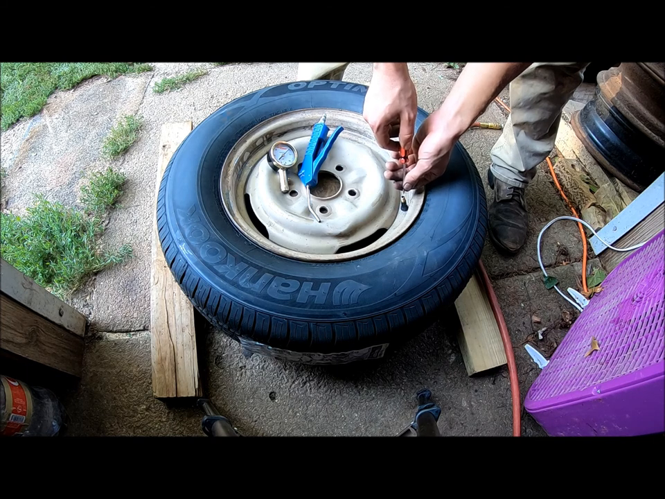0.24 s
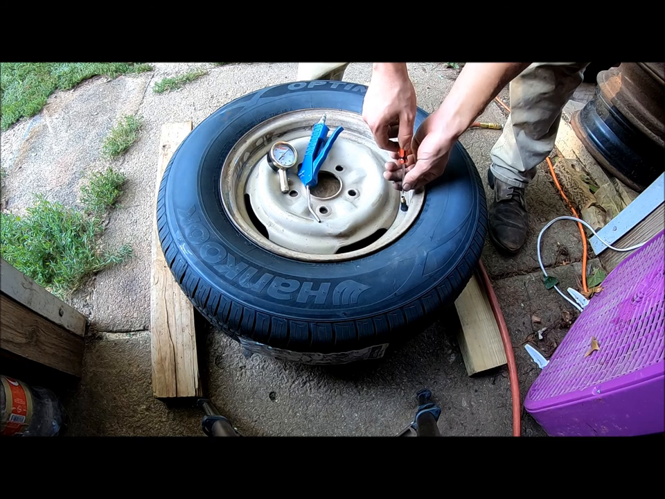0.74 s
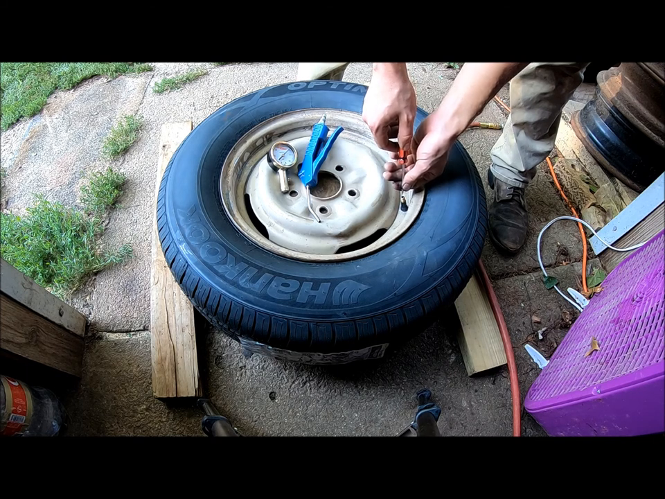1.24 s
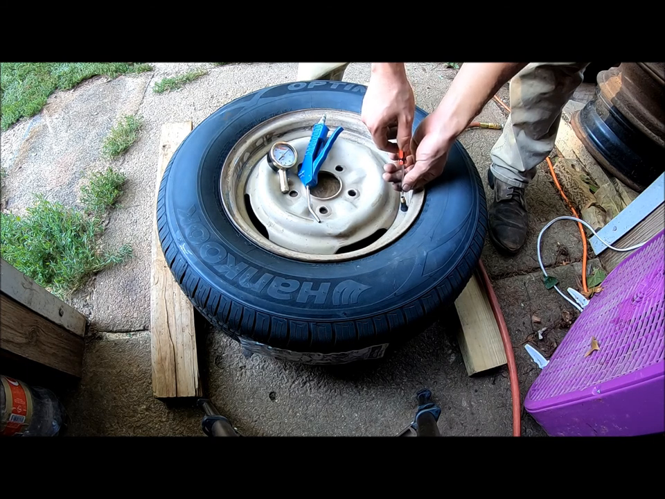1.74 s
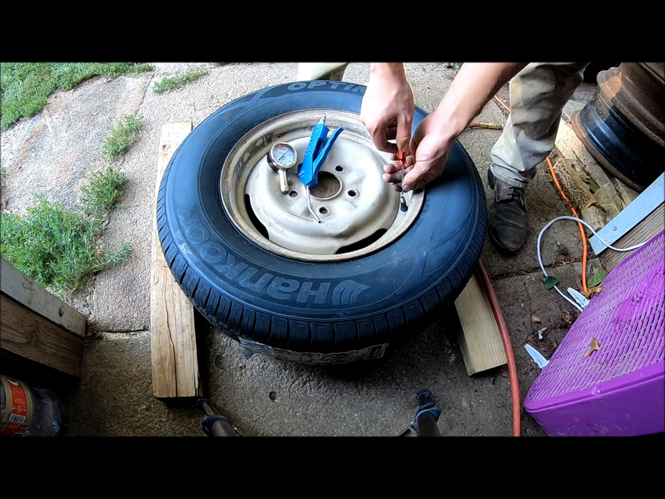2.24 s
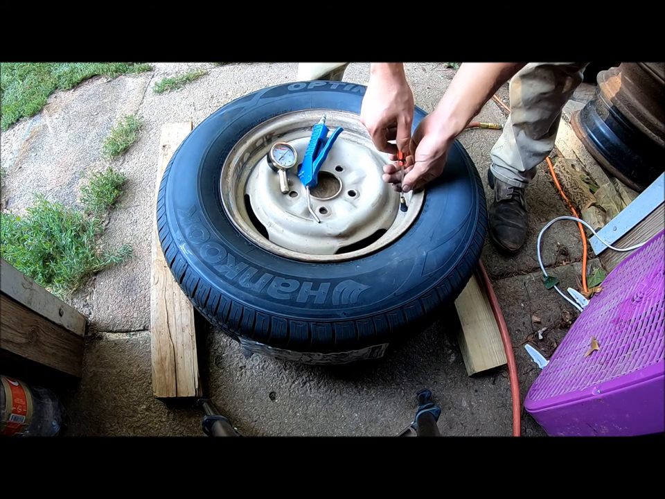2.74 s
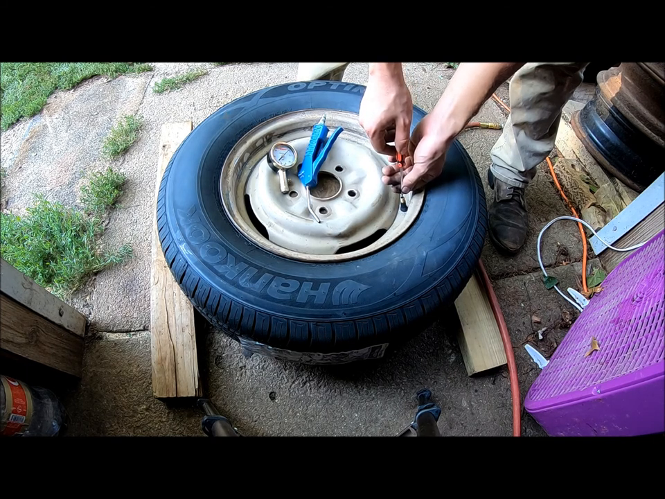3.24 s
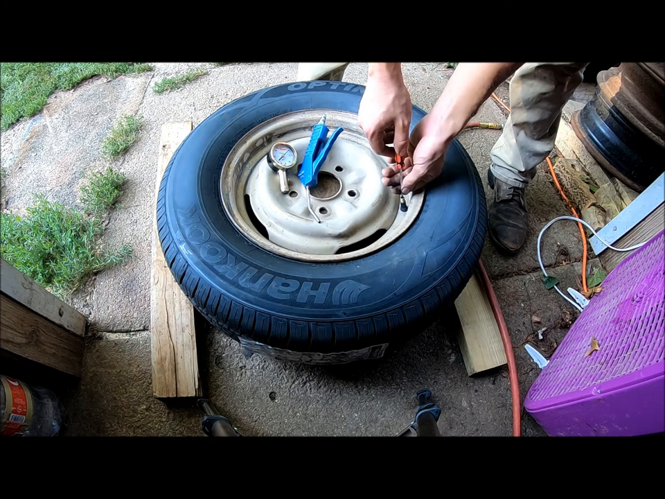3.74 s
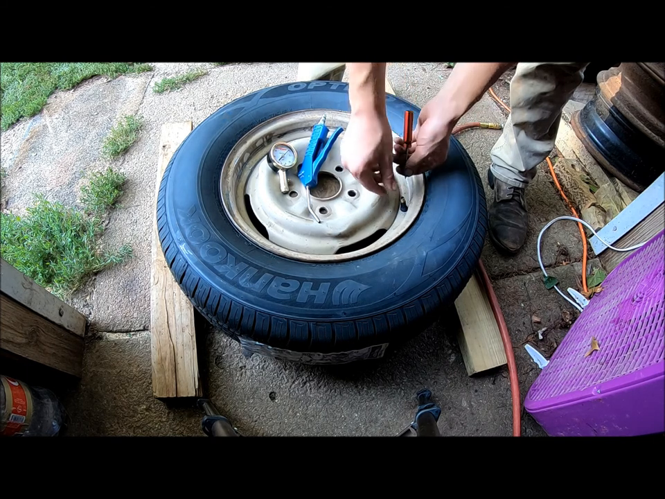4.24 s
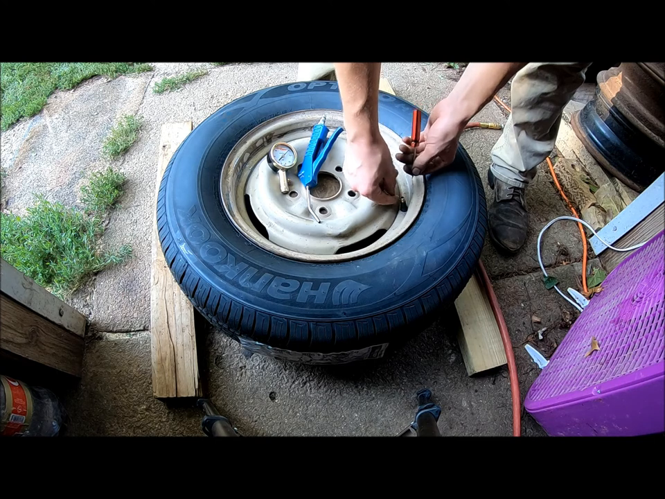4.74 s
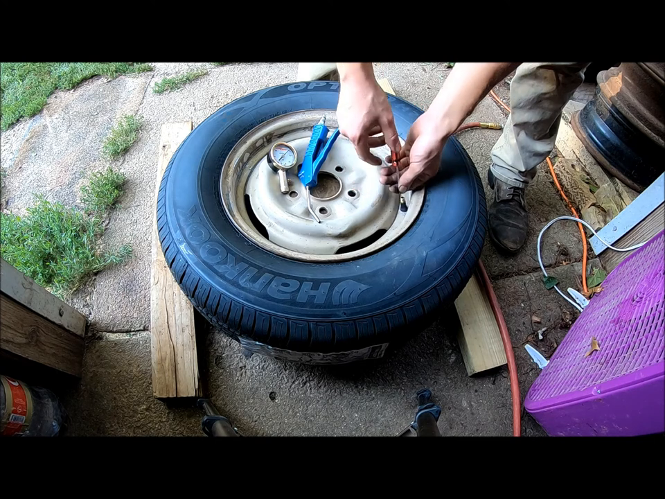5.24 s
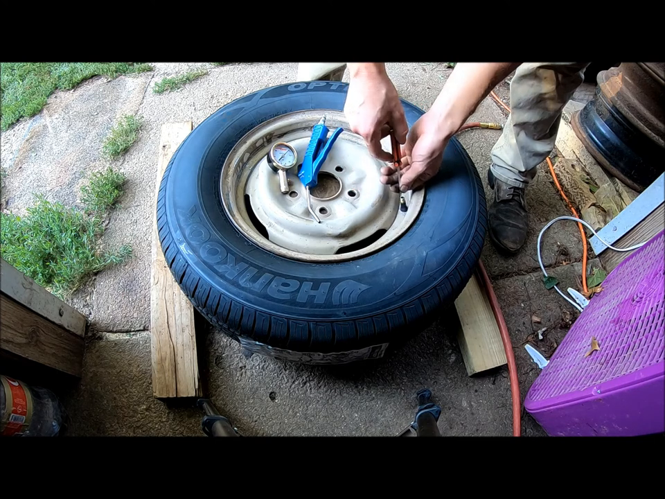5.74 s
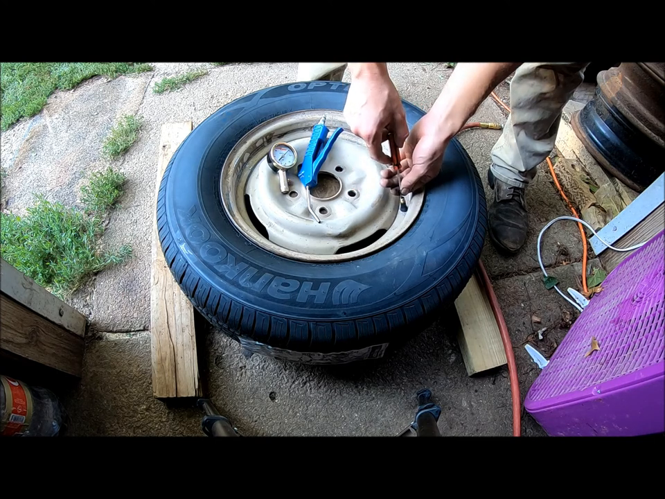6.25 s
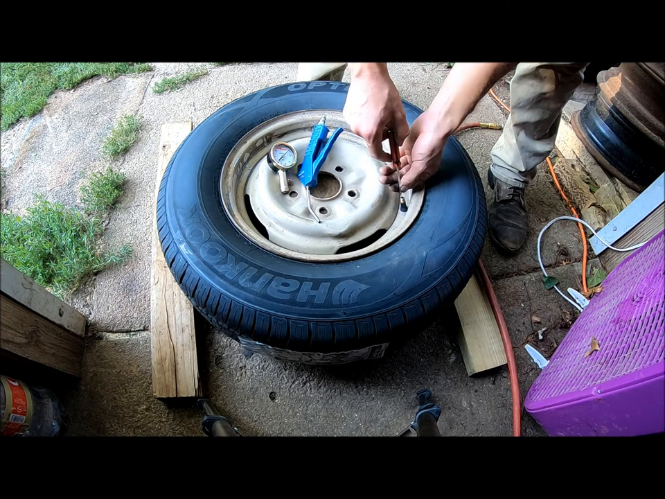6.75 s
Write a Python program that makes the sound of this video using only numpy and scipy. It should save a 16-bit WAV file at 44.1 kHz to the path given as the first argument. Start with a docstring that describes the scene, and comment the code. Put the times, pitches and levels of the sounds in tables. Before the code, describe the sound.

From the start, compressed air is already hissing out of a tire valve, a bright, continuous jet with a faint, very high whistle in it. It is loudest in the first second and fades gradually as the pressure drops. From about 4.1 seconds the tone wavers as hands move around the valve and rim. At 4.6 seconds a finger shuts the valve, cutting the hiss for about a tenth of a second; it pops half open and is flowing freely again by 4.8 seconds. The hiss continues more softly, with faint whistling resonances coming and going, and is still running, much weaker, at about 7 seconds. A nearby fan gives a quiet, low hum and rumble throughout. The sound is in stereo, with a very short, diffuse reverberation from the garage walls.

```python
"""Air escaping from a tire valve

A turbulent jet hisses in a garage doorway and fades as the pressure drops. The hollow wheel and the
valve stem filter its noise, the stem whistling faintly near 7 kHz. Cavities between hands and rim
resonate, and a finger briefly shuts the valve. A fan hums nearby; the walls add a short diffuse tail."""
import sys
import numpy as np
from scipy import signal
from scipy.fft import rfft, irfft, next_fast_len
from scipy.io import wavfile

SR = 44100
rng = np.random.default_rng(int(sys.argv[2]) if len(sys.argv) > 2 else 0)


def digitize_waveform(pressure):
    """Quantize a signal to 16-bit integers and store it at the path in sys.argv[1].

    Rows of a 2-D input are taken as channels; values are limited to [-1, 1].
    """
    field = np.atleast_2d(pressure).T
    bounded = np.clip(field, -1, 1)
    quanta = np.round(bounded * 32767).astype(np.int16)
    wavfile.write(sys.argv[1], SR, quanta)


N = 307818
PADDED = next_fast_len(N + SR // 4)
TIME = np.arange(PADDED) / SR
HZ = np.maximum(np.arange(PADDED // 2 + 1) * SR / PADDED, 1)
GARAGE_T60_S = 0.16


def from_db(db):
    """Amplitude ratio of a level in decibels."""
    return 10 ** (np.asarray(db) / 20)


def rms_one(x):
    """Normalisation to unit mean power."""
    return x / np.sqrt(np.mean(x ** 2) + 1e-20)


def over_hz(points):
    """Interpolation of (f/Hz, value) points on a logarithmic frequency axis."""
    hz, value = np.transpose(points)
    return np.interp(np.log(HZ), np.log(np.maximum(hz, 1)), value)


def over_time(points):
    """Linear interpolation of (t/s, value) points at every sample."""
    return np.interp(TIME, *np.transpose(points))


def lorentzian(hz, width):
    """Resonance curve of unit height, with its full width at half height in Hz."""
    return 1 / (1 + (2 * (HZ - hz) / width) ** 2)


def drift(rate_hz):
    """Random modulation: slow noise of unit rms from a two-pole low-pass."""
    step = 40
    pole = np.exp(-2 * np.pi * step * rate_hz / SR)
    white = rng.standard_normal(PADDED // step + 2002)
    slow = signal.lfilter([1], [1, -2 * pole, pole ** 2], white)[2000:]
    return np.interp(np.arange(PADDED) / step, np.arange(len(slow)), rms_one(slow))


def fan():
    """Fan noise: broadband rumble and narrow bands of hum, partly coherent in stereo, and a blade tone."""
    # rumble spectrum: f/Hz, relative level/dB
    rumble = [(12, -50), (20, -7.5), (60, -16.5), (107, -18), (127, -6), (155, -5), (195, -3.5), (274, -3),
              (335, -8.5), (414, -11.5), (513, -15.5), (600, -15), (780, -8.5), (1050, -17.5), (1500, -120)]
    # likeness of left and right: f/Hz, correlation coefficient
    correlation = [(50, 0.46), (110, -0.17), (200, 0.16), (380, -0.51), (700, -0.71)]
    # bands of hum: f/Hz, width/Hz, level/dB
    hum = [(47.2, 3.7, -81.5), (169.7, 33, -70), (183, 6.7, -81.5), (250.7, 8.6, -71.5)]
    rumble_db, blade_db, blade_hz = -59, -65.5, 246.2
    mid, side = rfft(rng.standard_normal((2, PADDED)))
    alike = over_hz(correlation)
    pair = np.sqrt(1 + alike) * mid + np.sqrt(1 - alike) * side * np.array([[1], [-1]])
    out = rms_one(irfft(pair * from_db(over_hz(rumble)), PADDED))
    out *= from_db(rumble_db + 1.4 * drift(1.3))
    for hz, width, db in hum:
        out += from_db(db + 2.5 * drift(.8)) * rms_one(irfft(pair * lorentzian(hz, width), PADDED))
    blade = np.sqrt(2) * np.sin(2 * np.pi * blade_hz * TIME + .5 * drift(1.7))
    out += from_db(blade_db + 1.1 * drift(3.1)) * blade
    return out[:, :N]


def with_tail(gain):
    """Exponential decay of reverberant energy: envelopes of direct sound, left tail and right tail."""
    decay = from_db(-120 / (GARAGE_T60_S * SR))
    power, _ = signal.lfilter([1 - decay], [1, -decay], gain ** 2, zi=[decay * gain[0] ** 2])
    return np.array([gain, np.sqrt(power), np.sqrt(power)])


def garage(source):
    """Superposition at two microphones: direct sound, wall echoes and a tail scattered by moving hands."""
    # reverberation: f/Hz, level/dB re the direct sound
    walls = [(350, -1), (800, 1), (1500, -1.5), (2800, -4.5), (3700, -5.5), (4200, -3), (5500, -1),
             (7200, -2), (8500, 8), (11000, 2), (13000, -3), (15000, 8)]
    # left minus right: f/Hz, level/dB
    balance = [(400, 1.5), (770, -1), (1500, -1), (4200, 0.5), (6000, 1.5), (6700, 1), (7200, 6), (7900, 2),
               (9000, 1.5), (12000, 0.5), (15000, 5)]
    # lead of the left channel: f/Hz, phase/rad
    lead = [(1000, 0), (4200, -.3), (6600, -.6), (7300, .1), (8000, -1.2), (9400, -2.0), (10500, -1.0),
            (12000, -.4), (15200, -.7)]
    first_echo_s, echo_share = 0.0036, .32
    direct, *scattered = rfft(source)
    t = np.arange(SR // 2) / SR
    echoes = rng.standard_normal((2, len(t))) * from_db(-60 * t / GARAGE_T60_S) * (t > first_echo_s)
    echoes /= np.sqrt(np.mean(np.sum(echoes ** 2, axis=1)))
    tail = np.sqrt(echo_share) * direct * rfft(echoes, PADDED)
    tail += np.sqrt(1 - echo_share) * np.array(scattered)
    side, wet = np.array([[.5], [-.5]]), from_db(over_hz(walls))
    heard = (direct * np.exp(1j * side * over_hz(lead)) + wet * tail) / np.sqrt(1 + wet ** 2)
    return irfft(heard * from_db(side * over_hz(balance) + 1.0), PADDED)[:, :N]


def hand_cavities(hiss_gain):
    """Cavity resonance between hands and rim: narrow bands of noise that glide as the fingers move."""
    # resonances: start t/s, end t/s, first f/Hz, last f/Hz, width/Hz, level/dB re the hiss
    cavities = [(-.3, .75, 7390, 7370, 130, 0), (4.1, 4.43, 7300, 7250, 200, -1),
                (4.44, 4.6, 6400, 6450, 500, 0), (4.8, 5.02, 6500, 6900, 700, -1),
                (6.2, 6.9, 6600, 6500, 400, -6), (-.3, 1.2, 3750, 3600, 320, -6),
                (1.1, 2.4, 9900, 9800, 150, -18), (1.85, 2.7, 3700, 3500, 200, -9),
                (2.6, 4.4, 10350, 10350, 150, -20), (2.8, 4.15, 4050, 3950, 150, -9),
                (3.1, 4.1, 7610, 7640, 110, 2), (4.43, 4.61, 2250, 2200, 200, -8),
                (4.46, 4.56, 3200, 3500, 400, -10), (4.22, 4.33, 3950, 4050, 150, -6),
                (1.6, 3.2, 2150, 2150, 200, -14), (4.76, 4.98, 5500, 5450, 250, -4),
                (5.0, 6.0, 3750, 3700, 200, -9), (4.9, 7.1, 4950, 4950, 600, -10),
                (4.77, 4.96, 4300, 4250, 190, 1), (5.0, 5.42, 7620, 7500, 220, 2),
                (5.38, 5.75, 3120, 3120, 130, -4.5), (5.3, 6.9, 1600, 1600, 200, -12),
                (5.48, 5.92, 7950, 7760, 200, 1), (5.75, 7.2, 7520, 7440, 190, 2),
                (6.0, 6.68, 3720, 3800, 170, -6), (6.15, 6.65, 3100, 3050, 130, -4.5),
                (6.7, 6.84, 4100, 4080, 90, -3)]
    out = np.zeros(PADDED)
    for start, end, first_hz, last_hz, width, db in cavities:
        span = slice(max(int(start * SR), 0), min(int(end * SR), PADDED))
        swell = np.sin(np.pi * np.clip((TIME[span] - start) / (end - start), 0, 1)) ** .5
        white = rng.standard_normal((2, PADDED // 2))[:, :len(swell)]
        pole = np.exp(-np.pi * width / SR)
        baseband = signal.lfilter([1], [1, -2 * pole, pole ** 2], white[0] + 1j * white[1])
        phase = 2 * np.pi * np.cumsum(np.linspace(first_hz, last_hz, len(swell))) / SR
        ring = rms_one(np.real(baseband * np.exp(1j * phase)))
        out[span] += from_db(db) * swell * hiss_gain[span] * ring
    return out


def wheel_and_stem():
    """Resonance and antiresonance of the hollow wheel and valve stem, as gain over frequency."""
    # broad shape of the jet's spectrum: f/Hz, relative level/dB
    colour = [(180, -33), (300, -20.5), (420, -27.5), (610, -24.5), (821, -18), (1000, -17), (1260, -17),
              (1560, -14), (2360, -12.5), (3570, -9.5), (5210, -13), (7140, -5), (7620, -6.5), (8560, -19),
              (11000, -24), (13100, -20), (15500, -31.5)]
    # peaks and notches: f/Hz, width/Hz, level change/dB
    resonances = [(1555, 280, 4.5), (1850, 150, -2), (2140, 260, 3.5), (2350, 150, -1.5), (3790, 140, 2),
                  (4150, 72, 3.5), (4315, 220, -4), (4450, 110, 2.5), (5050, 150, -1.5), (5510, 130, 1),
                  (6200, 100, 1), (6000, 150, -1.5), (6570, 120, 1.5), (8150, 100, 3), (8800, 120, -1.5),
                  (9890, 130, 6), (10080, 150, -1.5), (10330, 140, 3), (13200, 700, 2.5), (6730, 110, -4),
                  (6950, 120, 2), (7200, 110, 2), (7290, 70, -2), (7430, 120, -1.5), (7620, 90, 2.5),
                  (7730, 80, -3), (7950, 130, -4), (8410, 70, 3), (9020, 130, 3.5)]
    lift_db = sum(db * lorentzian(hz, width) for hz, width, db in resonances)
    return from_db(over_hz(colour) + lift_db)


def finger_on_valve():
    """Throttling, in dB: a finger shuts the valve and holds it; it pops half open, then clears."""
    start_s, shutting_s, held_s, pop_s, opening_s = 4.59, 0.014, 0.09, 0.033, 0.089
    times = start_s + np.cumsum([0, shutting_s, held_s, pop_s, opening_s])
    return np.interp(TIME, times, [0, -27, -26, -8, 0])


def jet(flicker_db):
    """Turbulent noise, fading band by band with the pressure. Rows: direct, left tail, right tail."""
    # open jet: t/s, hiss level/dB, then level/dB controls for lower whistle, upper whistle, top air
    course = [(0, -39, 6, 3, -9.5), (.4, -39.5, 3, 1.5, -11), (.8, -40.5, 6, 3.5, -10),
              (1.6, -43.5, 7, 3, -7.5), (2.1, -43.5, 6, 2.5, -9), (2.8, -45.5, 5, 3.5, -9.5),
              (3.6, -47, 5.5, 4.5, -10), (4.0, -47.5, 3.5, 1.5, -11), (4.25, -51, 4.5, 3.5, -11),
              (4.4, -51, 3, -1, -11.4), (4.47, -47, -1.5, -2, -14), (4.53, -49, 4.5, 0, -15),
              (4.59, -47, 3, 4, -12), (4.68, -47.5, 1, 1, -10), (4.741, -53, 3, 14, -6),
              (4.8, -49, -1, 9, -13), (4.88, -52.5, 8, 8, -10), (4.97, -51, 0, 5.5, -14),
              (5.1, -52.5, -1, -1, -12), (5.25, -53, -3, 6, -11), (5.4, -52.5, -2, 6, -13),
              (5.55, -51.5, -2, 2, -13), (5.75, -52.5, -3.5, 2, -12), (5.9, -55, -3, 7, -12),
              (6.1, -53, -5, 1, -16), (6.3, -53, -1, -2, -13), (6.6, -54, -3, -5, -16),
              (6.8, -57.5, -4, 2, -13), (6.98, -59, -2, 3, -14)]
    # control for the trough between the wheel's ring and the stem whistle: t/s, level/dB
    trough = [(0, 0), (.9, 1.5), (1.4, -4), (1.9, 0), (2.3, -1), (2.9, -1.5), (3.3, -1.5), (4.3, -1.5),
              (4.5, 0.5), (4.9, 1.5), (5.3, 2), (6.0, -1), (6.5, 5), (6.98, -3)]
    # control for the mids near 2 kHz: t/s, level/dB
    mids = [(0, -1.5), (1, 0), (2.5, -0.5), (4.1, 1.5), (4.2, -1.5), (4.4, 0.5), (4.45, 1.5), (4.6, 3.5),
            (4.8, -1), (5, -0.5), (5.3, -2.5), (5.4, 1.5), (6, -1), (6.98, 0)]
    # weight of the mids control in each band
    mids_weights = [0, 0.028, 0.6, 0.17, 0, 0, 0.086, 0, 0, 0.19, 0]
    # crossovers between the bands: f/Hz
    edges = [450, 1300, 2600, 4300, 5600, 6800, 7350, 8000, 10200, 11800]
    # bands, low to high: level/dB re the hiss, level change/dB with the hands away,
    # then weights of pressure, trough, lower whistle, upper whistle, top air, finger
    bands = [(-27, -2.5, 0.69, .01, .01, .01, .01, .4), (-12.5, -3.5, 0.17, .01, 0.0091, .01, 0.0089, 0.51),
             (-2, -3, 0.06, .01, 0.055, 0.0092, 0.019, 0.71),
             (-0.14, -0.5, 0.005, .05, 0.0078, 0.028, .01, 0.97), (-5, 0.5, .01, 0.61, .033, .2, .01, 1.03),
             (-1.05, 0.5, 0.012, 0.18, 0.41, 0.19, 0.0093, 1.14),
             (-.03, -0.4, .01, .01, 0.91, .01, .01, 0.91), (0.14, 0.5, .01, .01, .01, 0.74, .01, 0.91),
             (-2.5, -0.5, .01, .01, 0.081, 0.24, 0.25, 0.9), (-8.5, 1, 0.18, .01, .01, .01, 0.73, 1.1),
             (-3.5, 1, .01, .01, .01, .01, 0.91, 1.3)]
    times, *columns = np.transpose(course)
    hiss_db, *treble_db = [np.interp(TIME, times, column) for column in columns]
    pressure_db = hiss_db + 47  # about the mean level of the hiss
    hands_away = np.interp(TIME, [2.9, 3.7, 5.07, 5.35], [0, 1, 1, 0])
    finger_db, mids_db = finger_on_valve(), over_time(mids)
    controls = np.array([hands_away, pressure_db, over_time(trough), *treble_db, finger_db])
    spectrum = rfft(rng.standard_normal((3, PADDED))) * wheel_and_stem()
    high_pass = [1] + [.5 + .5 * np.tanh((HZ / hz - 1) / 0.016) for hz in edges] + [0]
    out = np.zeros((3, PADDED))
    for k, (db, *weights) in enumerate(bands):
        band = rms_one(irfft(spectrum * (high_pass[k] - high_pass[k + 1]), PADDED))
        band_db = hiss_db + db + np.dot(weights, controls) + mids_weights[k] * mids_db
        out += band * with_tail(from_db(band_db + flicker_db * drift(10.8)))
    out[0] += hand_cavities(from_db(hiss_db + finger_db))
    return out


def scene():
    """Superposition of independent sources: the jet in the garage and the fan."""
    return garage(jet(flicker_db=0.84)) + fan()


def record(dry):
    """Band limiting by a steep elliptic low-pass."""
    cutoff_hz = 15720
    return signal.sosfilt(signal.ellip(12, .5, 70, cutoff_hz, fs=SR, output="sos"), dry)


dry = scene()
out = record(dry)
digitize_waveform(out)
```